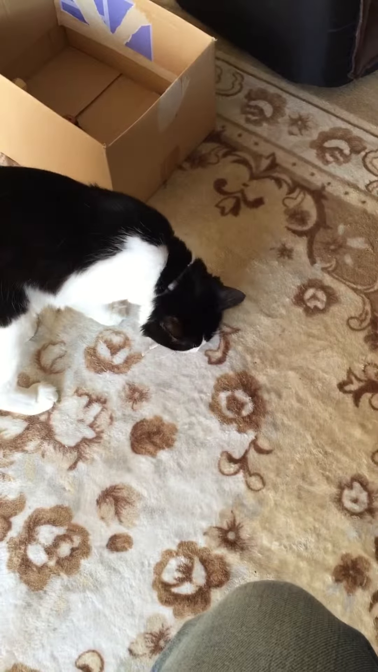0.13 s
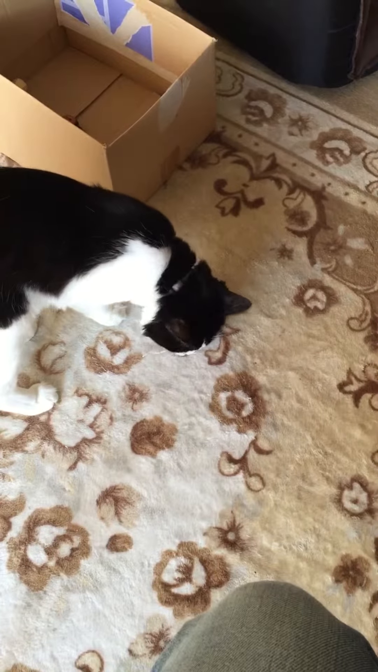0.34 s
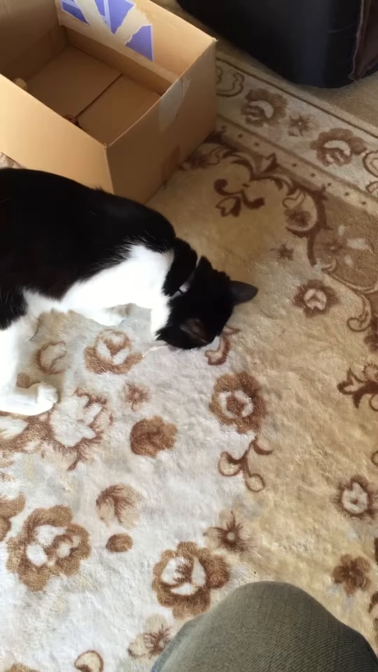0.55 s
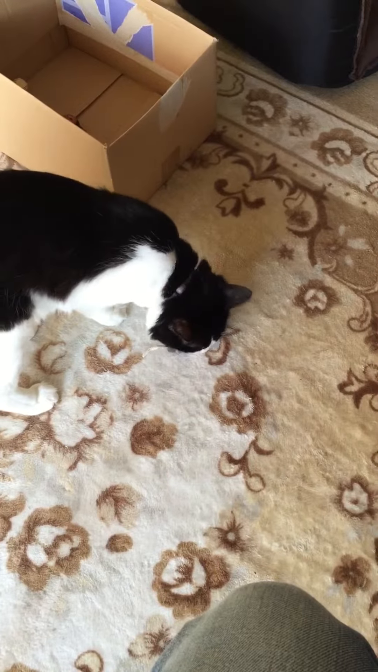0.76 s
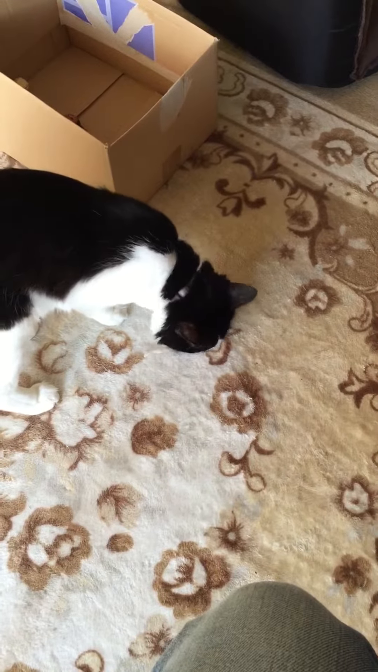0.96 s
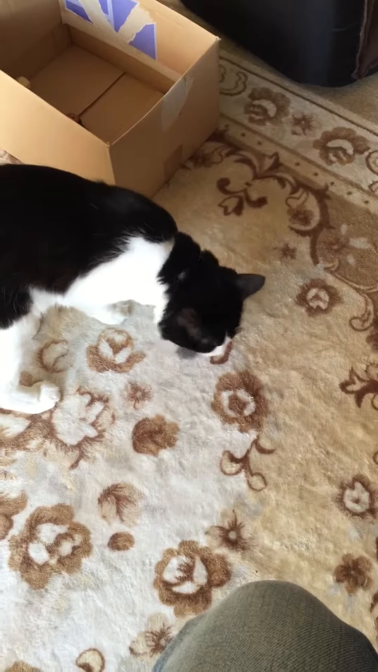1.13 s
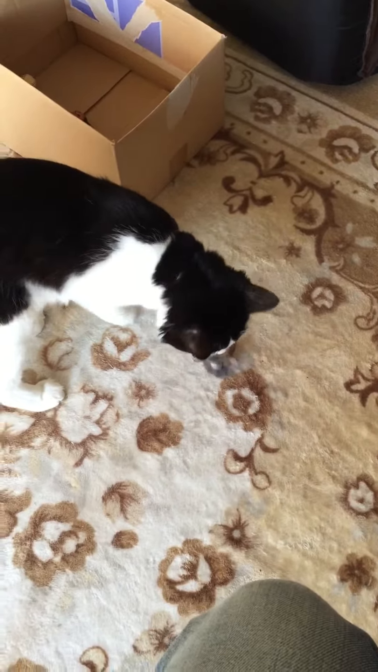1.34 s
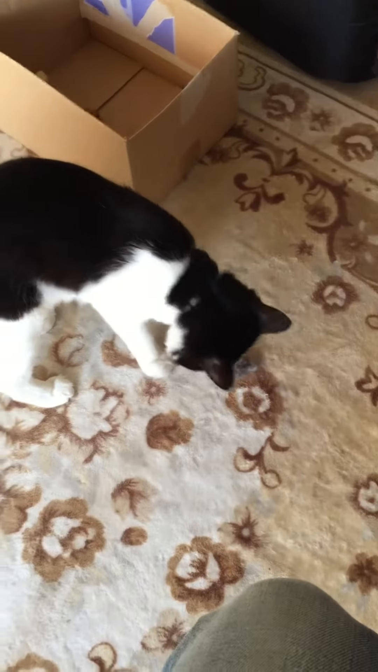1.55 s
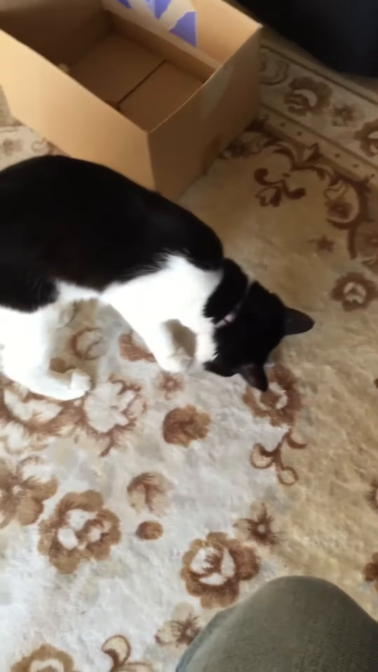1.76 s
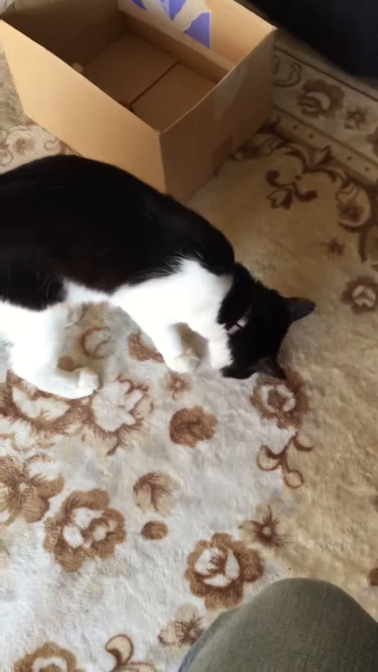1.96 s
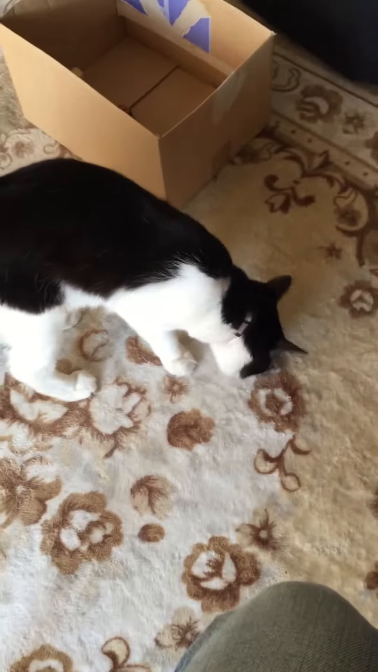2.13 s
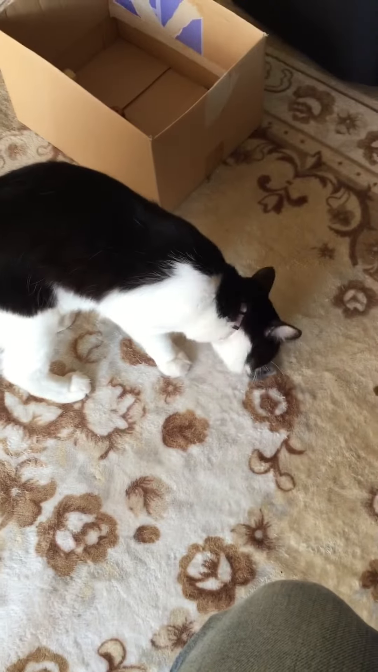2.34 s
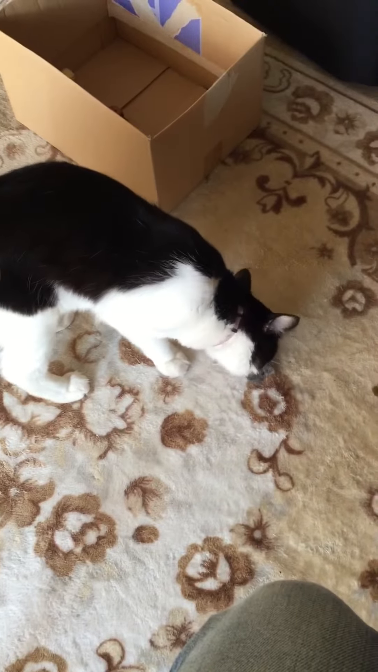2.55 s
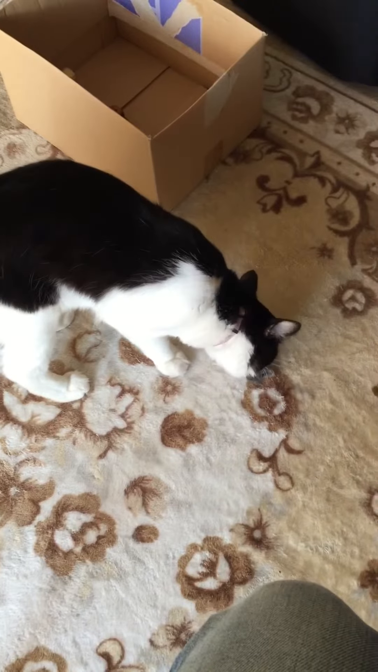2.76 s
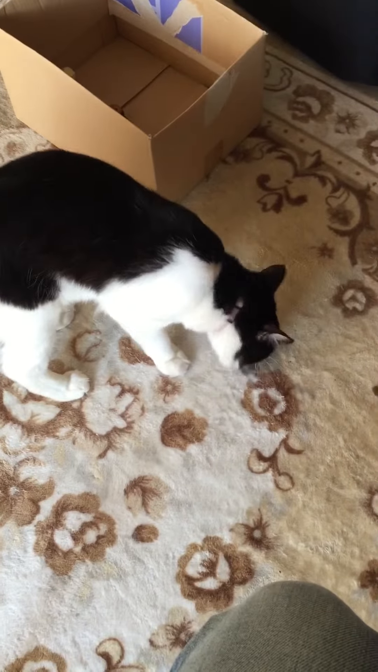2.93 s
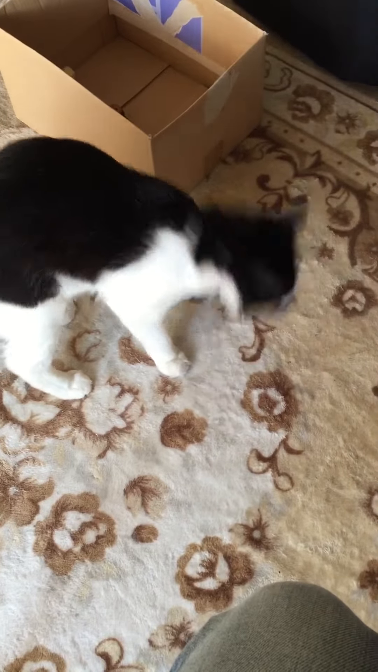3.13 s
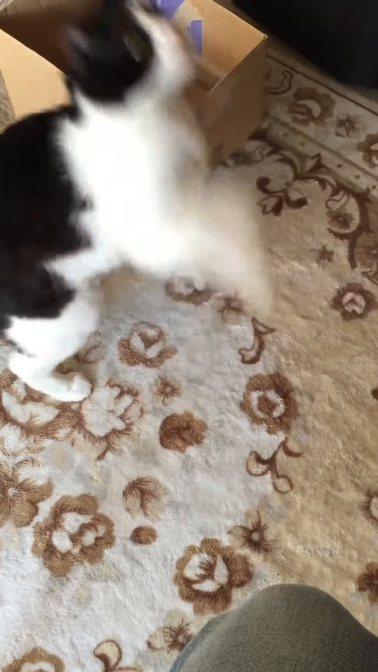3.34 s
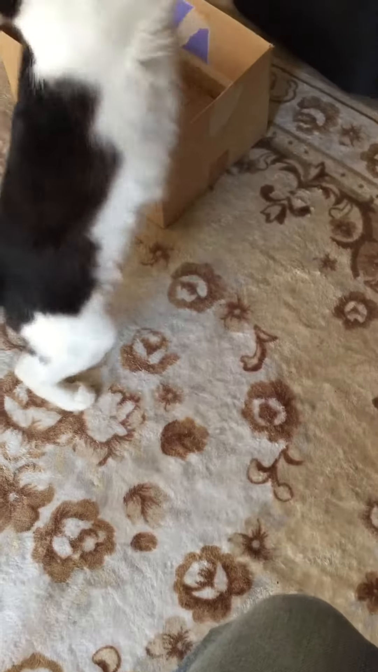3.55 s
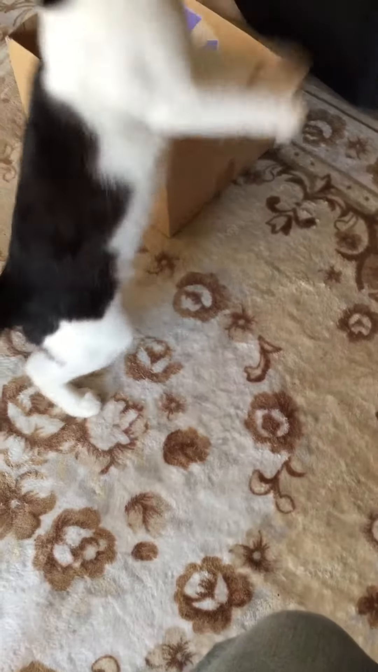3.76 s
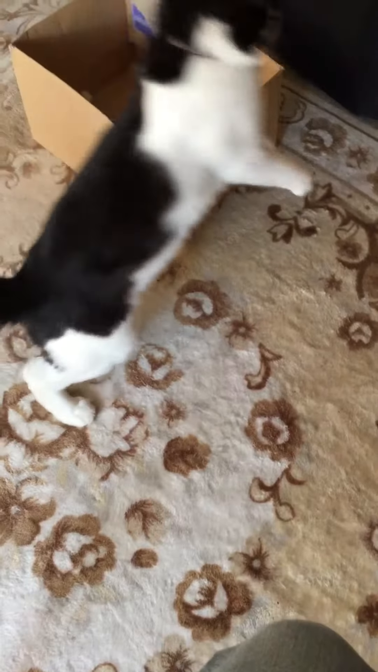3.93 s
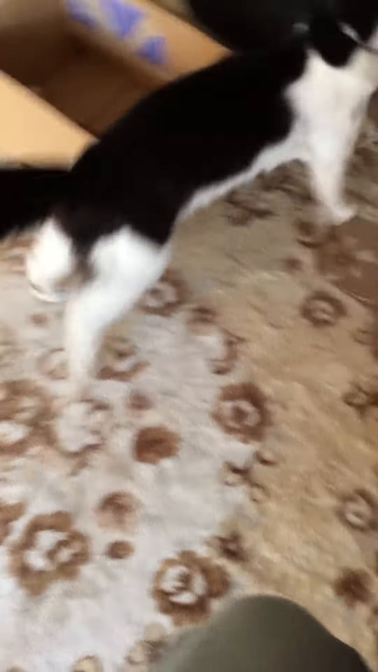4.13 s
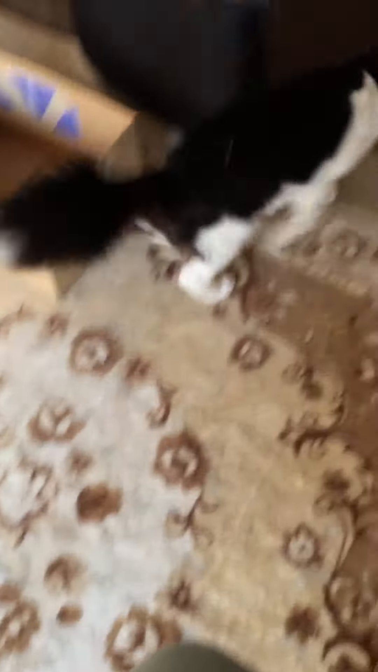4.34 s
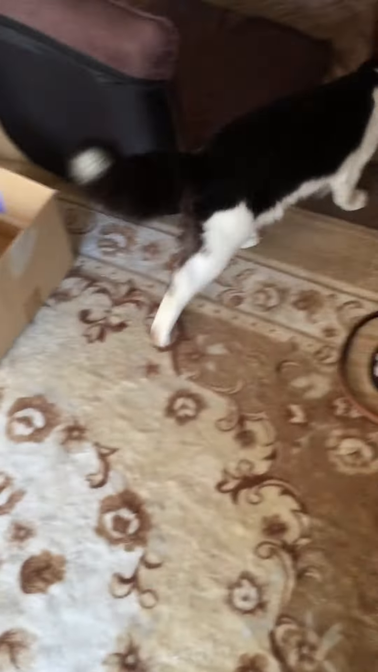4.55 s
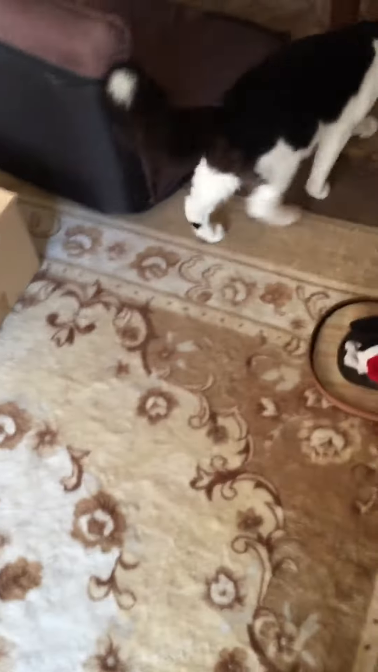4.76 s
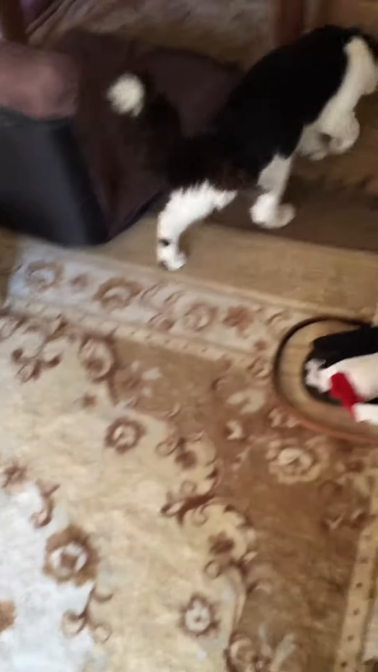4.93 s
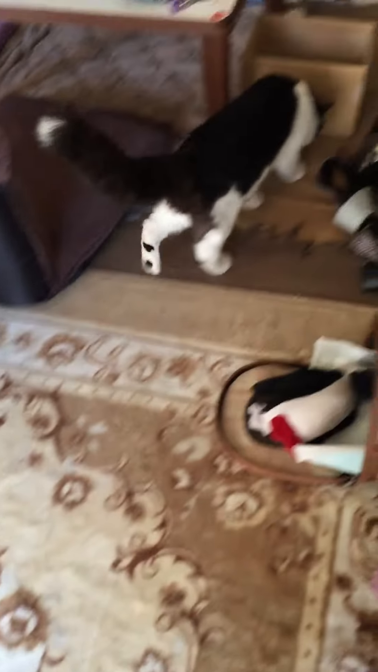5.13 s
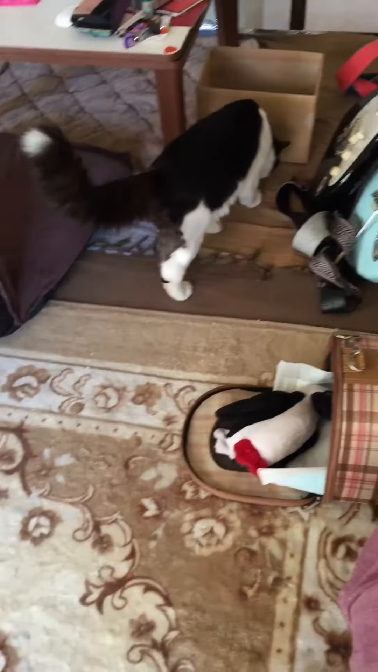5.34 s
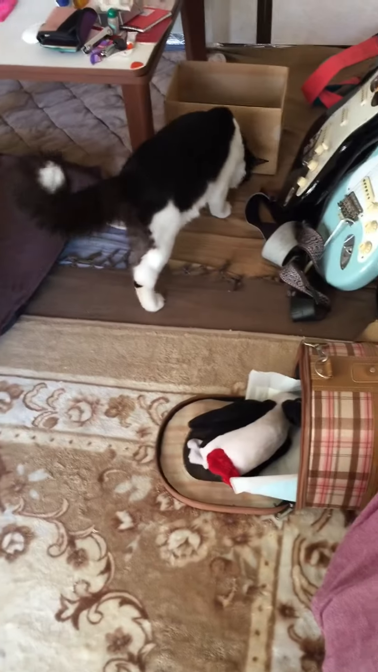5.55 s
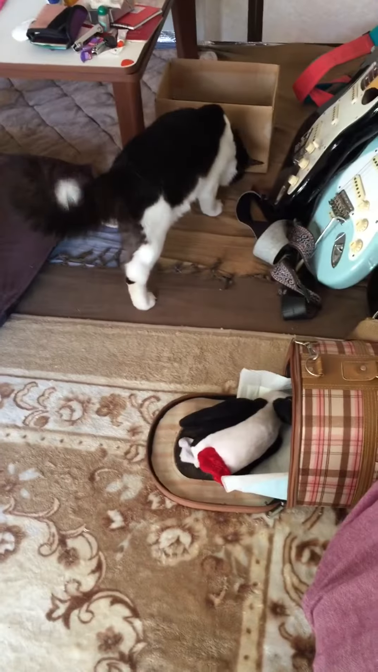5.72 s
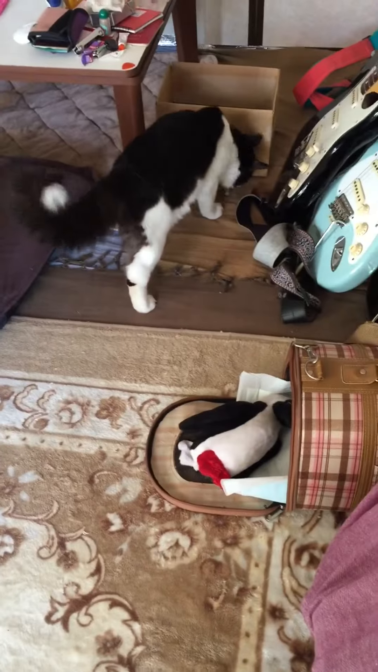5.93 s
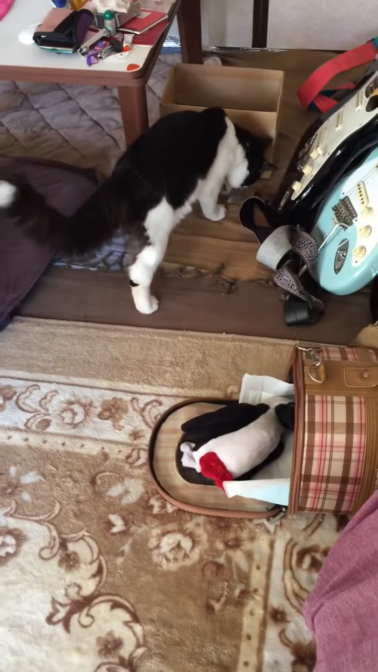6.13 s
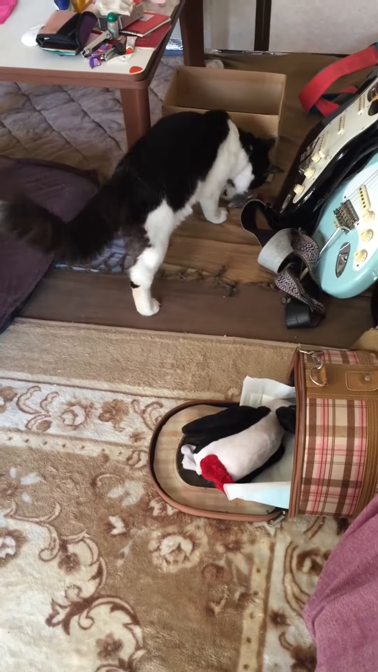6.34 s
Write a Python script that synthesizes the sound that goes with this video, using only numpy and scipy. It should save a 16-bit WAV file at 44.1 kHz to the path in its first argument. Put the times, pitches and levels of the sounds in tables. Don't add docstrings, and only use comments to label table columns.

```python
import sys
import numpy as np
from scipy import signal
from scipy.fft import rfft, irfft, next_fast_len
from scipy.io import wavfile
from scipy.ndimage import uniform_filter1d

SR = 44100
rng = np.random.default_rng(int(sys.argv[2]) if len(sys.argv) > 2 else 0)


def elevation(decibels):
    levels = np.asarray(decibels, float)
    return 10 ** (levels / 20)


def generate_wav(signal):
    frames = np.transpose(np.atleast_2d(signal))
    scaled = np.clip(frames, -1, 1) * 32767
    pcm = np.round(scaled).astype(np.int16)
    wavfile.write(sys.argv[1], SR, pcm)


N = 286043

# frequency in Hz, level in dB per Hz.
HISS_COLOUR = [(15, -42), (33, -8), (68, -2), (97, -0.5), (145, -12.5), (285, -17.5), (463, -23),
               (575, -23), (796, -25), (2350, -30), (4870, -35.5), (6210, -36), (10400, -41),
               (14800, -41.5), (16000, -48)]
HISS_DB = -60.9

# frequency in Hz, width in Hz, level in dB.
ROOM_MODES = [
    [(54, 25, 0)],
    [(94.64, 21, -0.5), (77, 16, -7)],
    [(157.3, 22, 0)],
    [(213, 50, -0.5), (300, 70, -4)],
]
# offset in dB, share of the traffic's swing,
# fading in dB per s, own wandering in dB.
MODE_ANSWER = [(-9.5, .2, 0.1, 2), (-.3, 1.05, 0.1, 1.1), (-10.5, .15, -2.1, 1.8), (-13.5, .25, -1.3, 2.5)]
# time in seconds, level in dB.
TRAFFIC = [(0.0, -54), (1.17, -57), (1.25, -47), (1.52, -57), (1.59, -49), (1.81, -60), (2.06, -50),
           (2.28, -64), (2.71, -57), (3.12, -69), (3.16, -52), (3.23, -63), (4.71, -57), (5.15, -69),
           (5.56, -48), (5.89, -65), (6.34, -60), (6.49, -69)]
# time in seconds, swell in dB.
WEIGHT_SHIFTS = [(.15, 9), (1.83, 5), (2.6, 8), (3.44, 15), (3.94, 13), (4.06, 16), (4.4, 12), (4.95, 6),
                 (5.33, 8), (5.55, 12), (6.35, 9)]
SHIFT_S, WANDER_HZ = .06, 2.5
PASS_S, PASS_DB, PASS_LENGTH_S = 1.1, 7, .4

# ratio to the shell pitch, width in Hz, level in dB.
SHELL = [(.75, 350, -5.5), (.96, 260, 4.5), (1.1, 240, 3.5), (1.301, 300, -7.5)]
# frequency in Hz, width in Hz, level in dB.
UPPER_SHELL = [(2890, 250, -7), (3510, 150, -2), (4070, 230, -4), (4720, 380, -13.5)]
# frequency in Hz, width in Hz, level in dB.
BRIGHT_SHELL = [(5435, 500, -1.5), (6393, 450, 0.5), (7800, 700, -2), (9500, 900, -5), (11800, 1200, -7.5),
                (14000, 2000, -11.5)]
# frequency in Hz, width in Hz, level in dB.
CLICK_TOP = [(4400, 250, -6), (6200, 450, -15)]

# start in seconds, rattle in dB,
# settling time in seconds per 60 dB, shell pitch in Hz, brightness in dB.
JOLTS = [(0.0, -54, .12, 1870, -14), (1.368, -56, .2, 2050, 3), (1.512, -70, .9, 2100, -3),
         (2.033, -66, .32, 2280, -18), (2.972, -72, .5, 2080, 3), (3.192, -66, .2, 2500, 5),
         (3.38, -76, .4, 2600, 10), (3.574, -47, .1, 2050, 7), (3.606, -45, .33, 2050, 2),
         (4.045, -43, .17, 1913, 9), (4.266, -32, .12, 1900, 3), (4.325, -46, .45, 2200, 2),
         (4.49, -61, .2, 2250, -9), (4.558, -63, .16, 2300, -12), (5.856, -51, .11, 2200, -5),
         (6.196, -68, .6, 2400, -6)]
# loudest moment in seconds, rattle in dB,
# build-up in seconds per 60 dB, shell pitch in Hz, brightness in dB.
ROLLS = [(1.27, -70, .3, 2900, 6), (1.35, -75, .4, 3000, 8), (1.595, -68, .3, 2200, -5),
         (3.075, -72, .25, 2100, 5), (3.185, -74, .2, 2400, 6), (4.47, -55, 1.2, 2250, -6),
         (4.695, -50, .34, 2100, -1), (5.54, -68, .35, 2600, -4), (6.075, -65.5, .3, 2400, -6),
         (6.376, -57.5, .36, 2130, -20)]
JOLT_START_S, ROLL_STOP_S = .007, .085
UPPER_DB, UPPER_FOLLOWS, CRACKLE_DB = -6, .7, -11.5

# start in seconds, ring in dB, shell pitch in Hz, hard
# click in dB, bright crack in dB.
NUDGE_TICKS = [(0.0194, -57, 1590, -78, -76), (0.3935, -56, 1500, -62.5, -80), (1.2531, -55, 2130, -65, -77),
               (1.2694, -57, 2970, -66, -64), (1.3683, -44, 2260, -53, -51), (1.3788, -27, 2060, -47.5, -51),
               (1.3914, -39, 2090, -72, -69), (1.4047, -38, 2150, -60, -66), (1.4304, -64, 2170, -63, -59),
               (1.4451, -48, 2070, -81, -73), (1.4584, -64, 2040, -65, -69), (1.517, -43, 2160, -59, -58),
               (1.5304, -44, 2110, -59, -64), (1.5559, -46, 2140, -74, -73), (1.5913, -39, 2200, -60, -76),
               (1.7664, -58, 1820, -66, -69), (2.0328, -49, 2270, -81, -83), (2.0412, -48, 2290, -75, -76),
               (2.9607, -52, 2010, -69, -73), (2.9724, -52, 1250, -54, -69), (2.9812, -50, 2240, -46.5, -59),
             (2.9864, -47, 2220, -52, -58), (3.0145, -50, 1820, -62, -70), (3.0836, -49, 2100, -54, -60),
             (3.1164, -60, 2900, -61, -67), (3.1956, -46, 2810, -47.5, -67),
             (3.3438, -46, 2620, -53.5, -64), (3.3922, -61, 2770, -50, -62), (3.5234, -61, 2210, -64, -76)]
# start in seconds, ring in dB, shell pitch in Hz,
# hard click in dB, bright crack in dB.
TOSS_TICKS = [(3.575, -29, 2300, -33, -38), (3.6062, -25, 2050, -37.5, -44.5),
              (3.6235, -35, 1990, -45.5, -72), (3.6446, -29, 1980, -39, -53.5),
              (3.6514, -44, 1950, -40, -48), (3.7227, -50, 1960, -56, -67), (4.0461, -26, 2130, -45, -30.5),
              (4.0545, -40, 2100, -46, -36), (4.1344, -67, 2170, -64, -60.5),
              (4.2652, -13, 1510, -50, -37.5), (4.3066, -43, 1720, -50.5, -58),
              (4.3263, -55, 2310, -39, -51), (4.34, -31, 1740, -34, -46.5),
              (4.3472, -31, 2210, -44.5, -41.5), (4.3664, -36, 2230, -49.5, -52),
              (4.3742, -35, 2320, -47, -48), (4.4019, -32, 2160, -37, -50), (4.4254, -43, 2330, -52, -47),
              (4.4524, -48.5, 2420, -49, -52), (4.563, -52, 2320, -61, -75),
              (4.5794, -51.5, 2680, -72, -67), (4.6399, -40, 1750, -49.5, -70),
              (4.6588, -38.5, 1820, -54.5, -63), (4.6744, -41, 2120, -49.5, -65)]
# start in seconds, ring in dB, shell pitch in Hz,
# hard click in dB, bright crack in dB.
FAR_TICKS = [(5.5124, -55, 2840, -74, -75), (5.5537, -70, 2970, -59, -71.5),
             (5.7269, -59.5, 2160, -79, -74), (5.7608, -59, 1620, -68, -71.5),
             (5.8546, -46, 2590, -57, -68.5), (5.8616, -47, 1820, -58, -71),
             (6.2826, -56, 2300, -68.5, -77.5), (6.3255, -56.5, 2050, -78, -76),
             (6.3425, -41, 2090, -72.5, -76), (6.3819, -45, 2200, -78, -76)]
TICK_T60_S, DAMPED_S_PER_DB = .023, .0003

# start in seconds, peak in dB.
STEPS = [(1.36, -50), (1.959, -44.5), (2.03, -52), (3.01, -52), (3.155, -48), (3.65, -53), (4.56, -53),
         (4.62, -54), (4.66, -55), (5.356, -56.5), (5.433, -56), (5.49, -48), (5.523, -35.5), (5.55, -41),
         (5.585, -46), (6.02, -51)]
# time in seconds, level in dB.
WHINE = [
    (2.3, -100),
    (2.6, -84),
    (3.9, -83),
    (4.6, -81.5),
    (5.0, -100),
]

# start in seconds, peak in dB.
BOX_HIT = [
    (4.0452, -28),
    (4.0495, -44),
    (4.068, -43),
]
# frequency in Hz, level in dB, t60 in seconds.
BOX = [(180, 0.5, 0.066), (330, -11, .1), (650, -10.5, .06), (1450, -3, .04), (2130, -1, .05),
       (2770, -7.5, .04)]
# frequency in Hz, level in dB, t60 in seconds.
BOX_SHUDDER = [(170, -37, 0.16), (300, -43, 0.081), (503, -42, 0.075), (900, -45, 0.1), (1404, -39.5, .12)]
# start in seconds, peak in dB.
KNOCK = [
    (4.2652, -41.5),
    (4.2659, -14),
    (4.2690, -19),
    (4.2745, -22),
]
# frequency in Hz, level in dB, t60 in seconds.
FLOORBOARD = [(175, -18, .12), (226, -10.5, .2), (287, -15, .12), (345, -9, 0.056), (400, 1.5, 0.065),
              (617, -8, 0.043), (690, -5.5, 0.065), (760, 8.5, 0.018), (855, -6.5, .06), (1055, -8, .055),
              (1120, -11.5, .015), (1395, -15.5, .07), (1530, -22, 0.087), (1860, -36, 0.1)]
# frequency in Hz, level in dB, t60 in seconds.
FLOOR_SHUDDER = [(197.6, -35, 0.33), (340, -28, 0.27), (560, -32, .2), (800, -30, 0.1892),
                 (1190, -30.5, 0.19), (1833, -49, .15)]

ROOM_T60_S, WALL_CUT_HZ = 0.24, 5000


def rms_one(x):
    return x / np.sqrt(np.mean(x ** 2) + 1e-20)


def level_curve(rows):
    s, db = np.transpose(rows)
    return np.interp(np.arange(N) / SR, s, db)


def ring(clicks, hz, t60):
    r = elevation(-60 / (t60 * SR))
    w = 2 * np.pi * hz / SR
    return signal.lfilter([0, np.sin(w)], [1, -2 * r * np.cos(w), r * r], clicks + 1e-18)


def resonate(x, peaks):
    out = 0
    for k, (hz, width_hz, level_db) in enumerate(peaks):
        r = np.exp(-np.pi * width_hz / SR)
        poles = [1, -2 * r * np.cos(2 * np.pi * hz / SR), r * r]
        mode = signal.lfilter([(1 - r * r) / 2, 0, (r * r - 1) / 2], poles, x)
        out = out + (-1) ** k * elevation(level_db) * mode
    return out


def cut(x, hz, kind, order=2):
    return signal.sosfilt(signal.butter(order, hz, kind, fs=SR, output="sos"), x)


def add(track, s, sound):
    at = round(s * SR)
    track[at:at + len(sound)] += sound[:N - at]


def hiss():
    hz = np.fft.rfftfreq(N, 1 / SR)
    points = np.array(HISS_COLOUR)
    colour = elevation(np.interp(np.log(hz + 1), np.log(points[:, 0]), points[:, 1]))
    noise = rms_one(irfft(rfft(rng.standard_normal(N)) * colour, N))
    return cut(elevation(HISS_DB) * noise, 15850, "low", order=16)


def rumble():
    out, t = np.zeros(N), np.arange(N) / SR
    traffic_db = level_curve(TRAFFIC)
    mean_db = traffic_db.mean()
    shift_db = sum(db * np.exp(-((t - s) / SHIFT_S) ** 2) for s, db in WEIGHT_SHIFTS)
    pass_db = PASS_DB * np.exp(-((t - PASS_S) / PASS_LENGTH_S) ** 2)
    for k, (answer, modes) in enumerate(zip(MODE_ANSWER, ROOM_MODES)):
        offset_db, share, fading_db, wander_db = answer
        hum = rms_one(resonate(resonate(rng.standard_normal(N), modes), modes))
        steadied = hum / np.sqrt(uniform_filter1d(hum ** 2, size=SR // 12) + 0.0876)
        wander = rms_one(cut(rng.standard_normal(N + SR), WANDER_HZ, "low")[SR:])
        swing_db = share * (traffic_db - mean_db) + fading_db * (t - t.mean()) + wander_db * wander
        if k == 0:
            swing_db += shift_db
        if k == 2:
            swing_db += pass_db
        out += elevation(mean_db + offset_db + swing_db) * rms_one(steadied)
    return out


def rattle():
    sizes = elevation(2.7 * np.minimum(rng.exponential(1, (3, N)), 4)) * rng.choice([-1, 1], (3, N))
    contacts_per_s = np.array([[1600], [1200], [300]])
    contacts = sizes * (rng.random((3, N)) < contacts_per_s / SR)
    upper = rms_one(resonate(contacts[1], UPPER_SHELL))
    crackle = rms_one(resonate(contacts[2] + .1 * rng.standard_normal(N), BRIGHT_SHELL))
    bouts = [(s, db, JOLT_START_S, t60, *rest) for s, db, t60, *rest in JOLTS]
    bouts += [(s, db, rise, ROLL_STOP_S, *rest) for s, db, rise, *rest in ROLLS]
    out = np.zeros(N)
    for s, rattle_db, rise, fall, hz, bright_db in bouts:
        span = slice(max(round((s - .5) * SR), 0), round((s + .5) * SR))
        t = np.arange(N)[span] / SR - s
        pitched = [(ratio * hz, width_hz, level_db) for ratio, width_hz, level_db in SHELL]
        mix = rms_one(resonate(contacts[0][span], pitched))
        mix = mix + elevation(UPPER_DB + UPPER_FOLLOWS * bright_db) * upper[span]
        mix = mix + elevation(CRACKLE_DB + bright_db) * crackle[span]
        out[span] += elevation(rattle_db - 2.5 - 60 * np.maximum(-t / rise, t / fall)) * mix
    return out


def ticks():
    out, t = np.zeros(N), np.arange(1800) / SR
    rows = NUDGE_TICKS + TOSS_TICKS + FAR_TICKS
    for s, ring_db, hz, click_db, crack_db in rows:
        t60 = max(TICK_T60_S - DAMPED_S_PER_DB * (ring_db + 45), .005)
        dying = elevation(-60 * t / t60)
        body = np.sin(2 * np.pi * hz * t) * dying * (1 - np.exp(-t / .0005))
        modes = [(f, 2.8 * width_hz, level_db + rng.normal(0, 3.6))
                 for f, width_hz, level_db in UPPER_SHELL + CLICK_TOP]
        click = rms_one(resonate(rng.standard_normal(len(t)) * dying, modes))
        crack = cut(rng.standard_normal(len(t)) * elevation(-60 * t / .007), [5200, 14500], "band")
        add(out, s, elevation(ring_db - 3.5) * body + elevation(click_db - 15.5) * click + elevation(crack_db + 6.5) * crack)
    return out


def steps():
    out, t = np.zeros(N), np.arange(6000) / SR
    swell = np.minimum(t / 0.013, 1) * elevation(-60 * t / 0.11)
    for s, peak_db in STEPS:
        puff = rms_one(cut(rng.standard_normal(len(t)), [70, 320], "band", order=4))
        add(out, s, elevation(peak_db) * puff * swell)
    return out


def whine():
    peak = [(2320, 30, 0)]
    tone = rms_one(resonate(resonate(rng.standard_normal(N), peak), peak))
    return elevation(level_curve(WHINE)) * tone


def blow(hits, modes, shudder, soft_hz):
    clicks, t = np.zeros(N), np.arange(SR // 2) / SR
    for s, peak_db in hits:
        add(clicks, s, np.array([elevation(peak_db)]))
    clicks = cut(clicks, soft_hz, "low")
    out = -sum(elevation(level_db) * ring(clicks, hz, t60) for hz, level_db, t60 in modes)
    for hz, level_db, t60 in shudder:
        band = rms_one(cut(rng.standard_normal(len(t)), [hz / 1.3, hz * 1.49], "band"))
        add(out, hits[0][0], elevation(level_db - 60 * t / t60) * np.minimum(t / .012, 1) * band)
    return cut(out, 165, "high", order=8)


def box_hit():
    return blow(BOX_HIT, BOX, BOX_SHUDDER, soft_hz=4000)


def landing():
    return blow(KNOCK, FLOORBOARD, FLOOR_SHUDDER, soft_hz=1800)


def room(x):
    size = next_fast_len(N + SR)
    w = 2 * np.pi * np.fft.rfftfreq(size)
    dull = 1 / (1 + 1j * w * SR / (2 * np.pi * WALL_CUT_HZ)) ** .3
    echoes = 0
    for k, lag_s in enumerate(rng.uniform(0.0044, .026, 10)):
        loop = elevation(-60 * lag_s / ROOM_T60_S) * dull * np.exp(-1j * w * lag_s * SR)
        echoes = echoes + (-1) ** k * loop / (1 - loop)
    return irfft(rfft(x, size) * echoes, size)[:N]


def scene():
    background = hiss() + rumble() + whine()
    toy = rattle() + ticks()
    blows = box_hit() + landing()
    wet = room(elevation(-22) * toy + elevation(-24.5) * blows)
    return (background + toy + steps() + blows + wet)[None]


def band_limit(x):
    return signal.sosfilt(signal.butter(12, 16530, fs=SR, output="sos"), x)


def record(dry):
    thinned = cut(dry, 42, "high", order=4)
    mix = 0.79 * np.tanh(thinned / 0.82)
    return band_limit(mix)


dry = scene()
out = record(dry)
generate_wav(out)
```